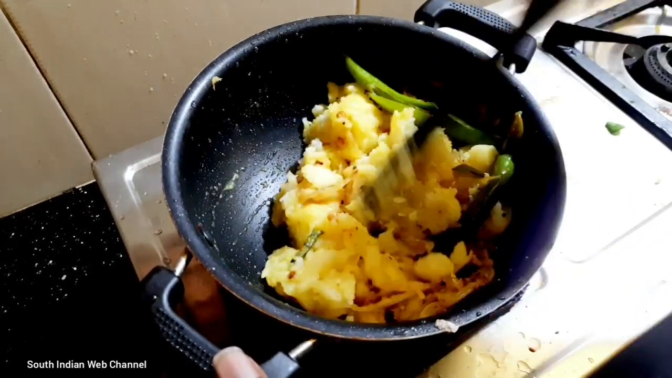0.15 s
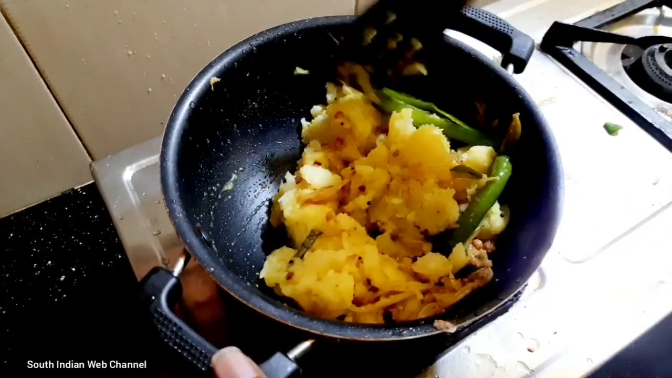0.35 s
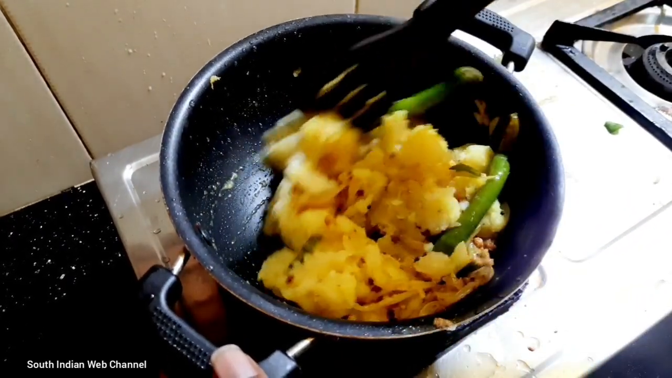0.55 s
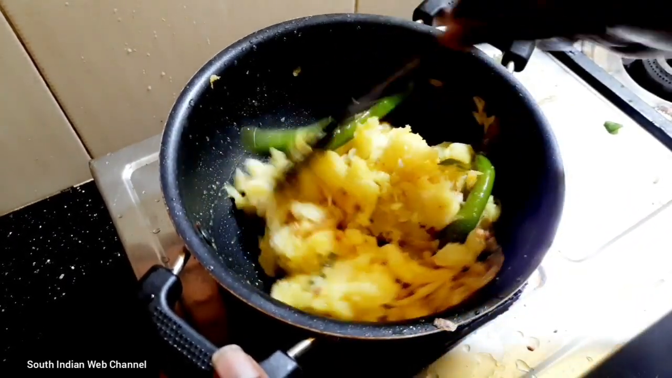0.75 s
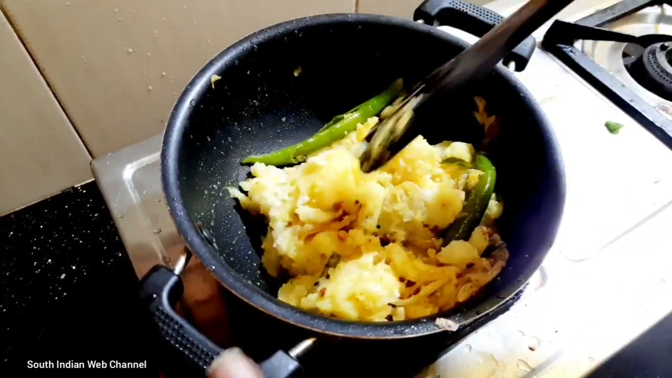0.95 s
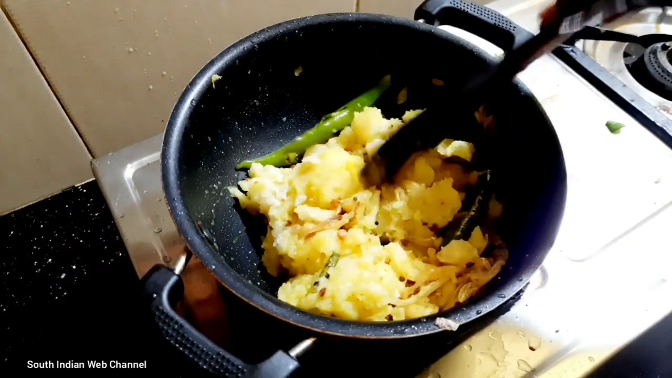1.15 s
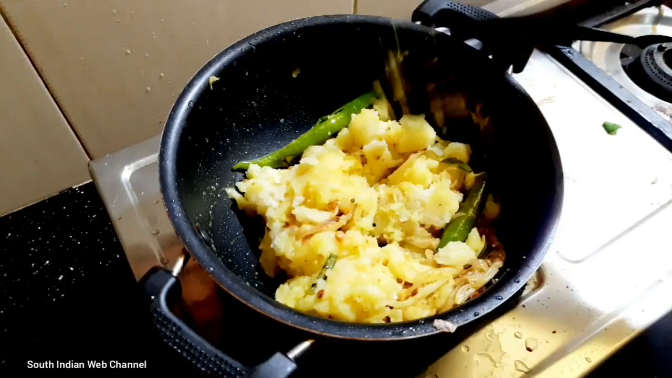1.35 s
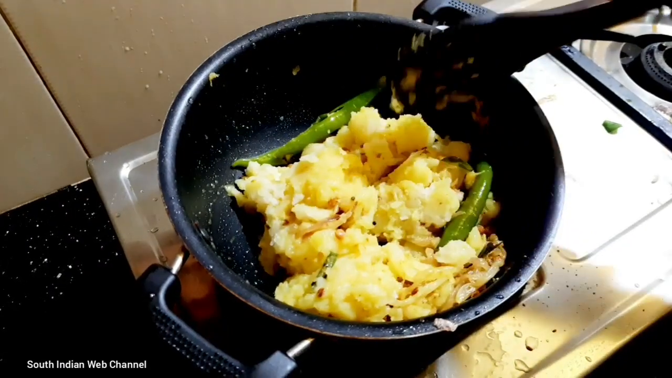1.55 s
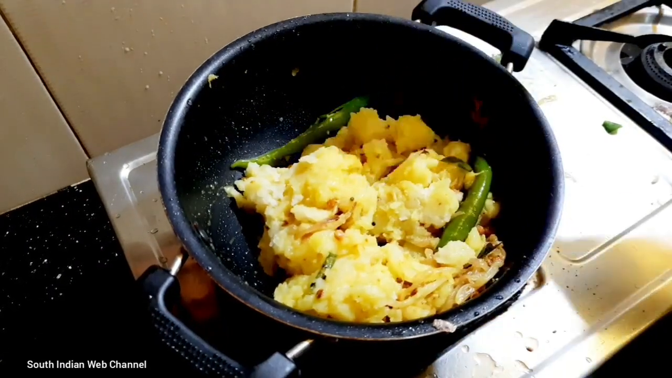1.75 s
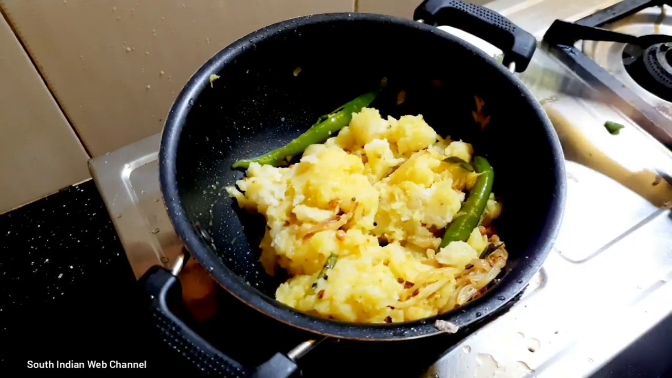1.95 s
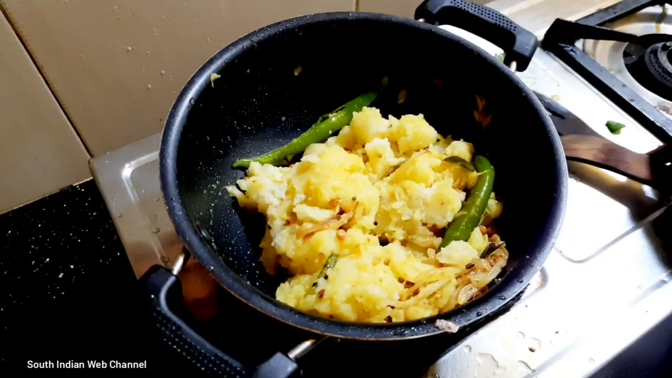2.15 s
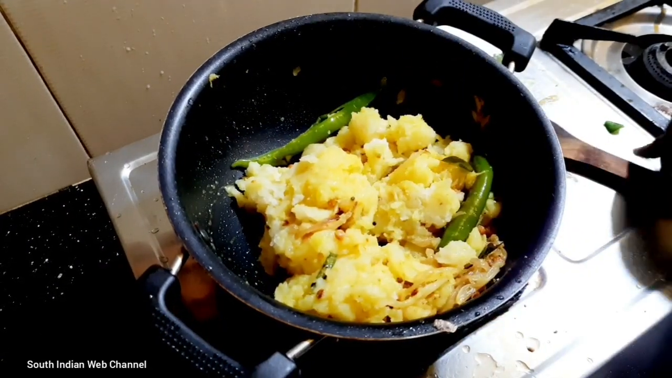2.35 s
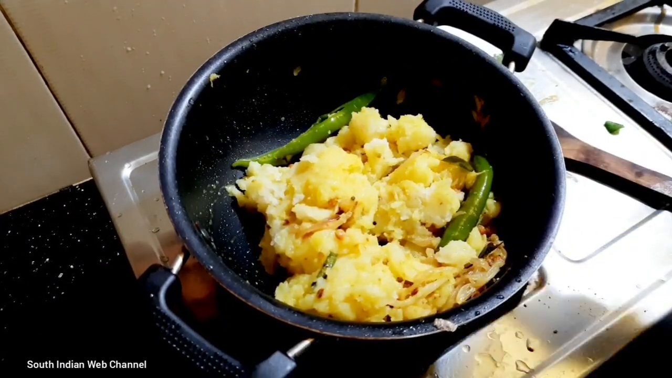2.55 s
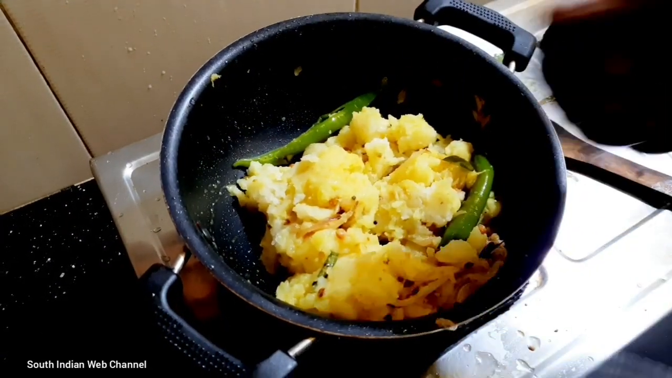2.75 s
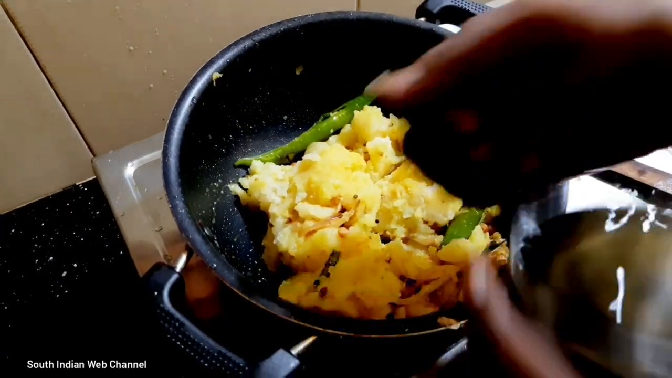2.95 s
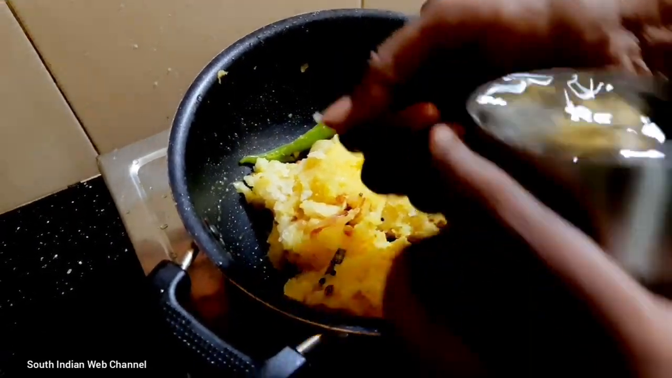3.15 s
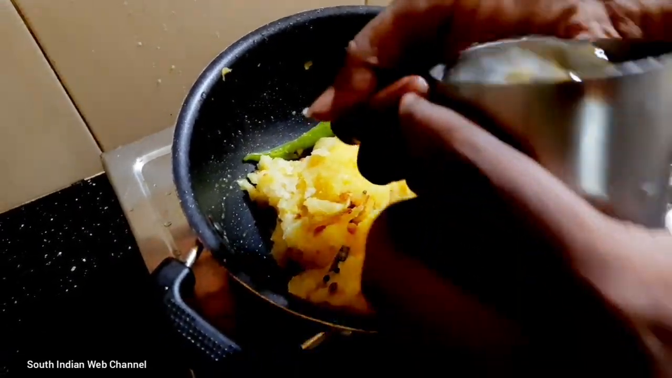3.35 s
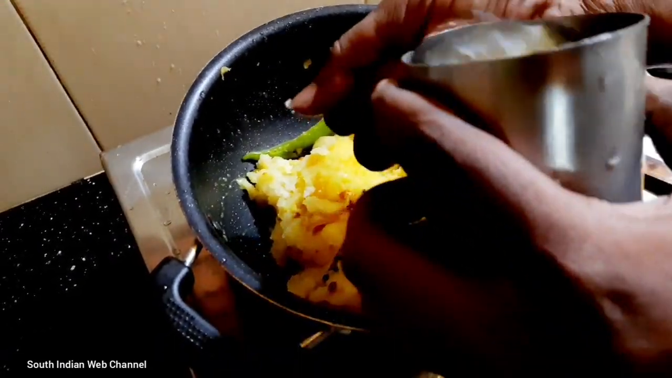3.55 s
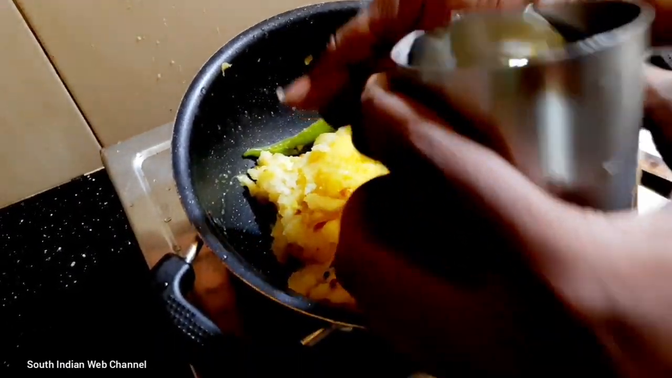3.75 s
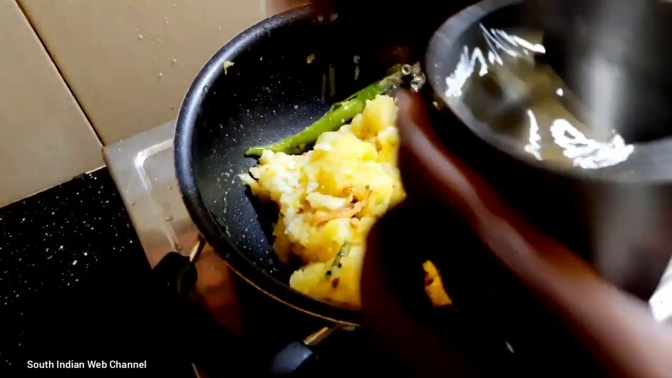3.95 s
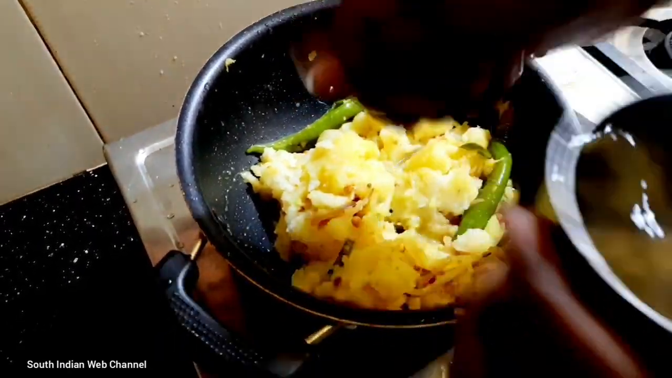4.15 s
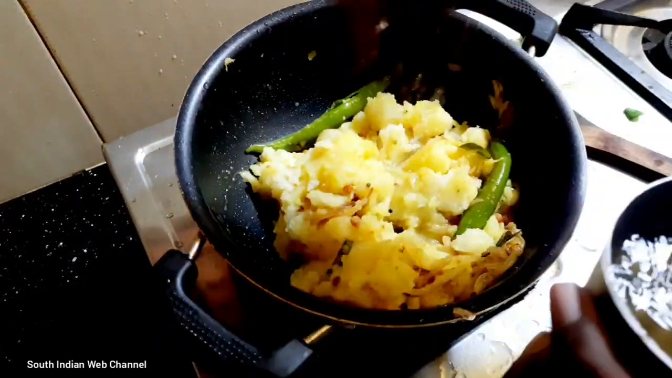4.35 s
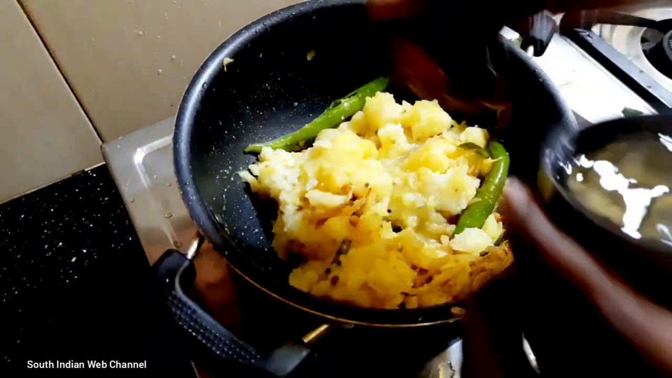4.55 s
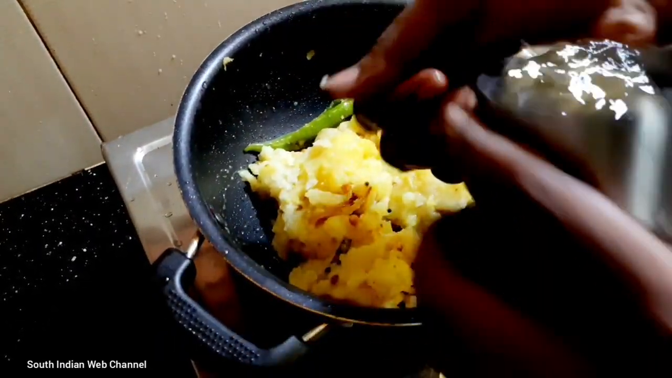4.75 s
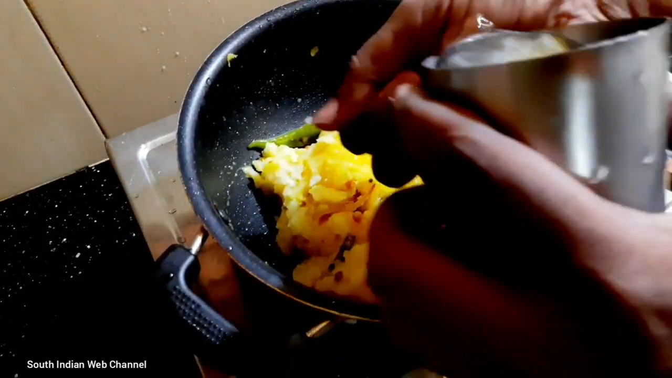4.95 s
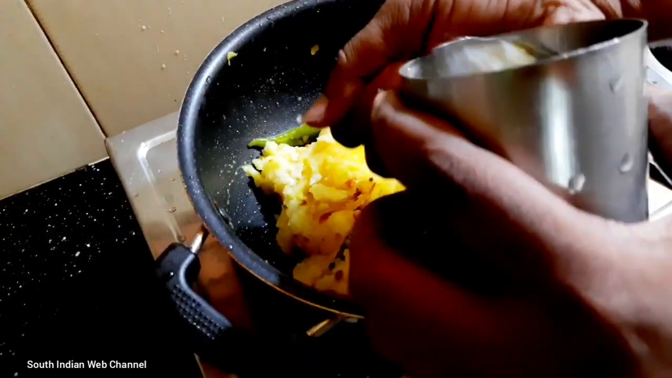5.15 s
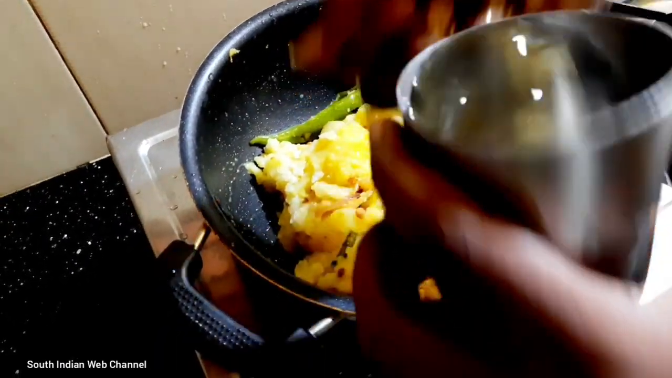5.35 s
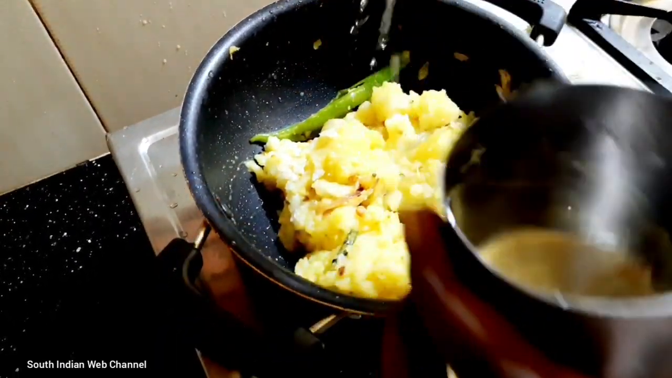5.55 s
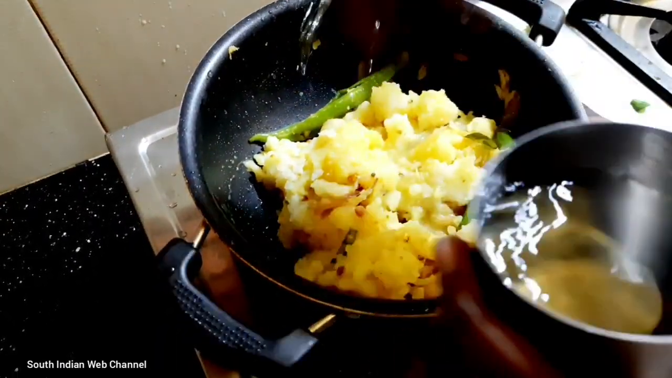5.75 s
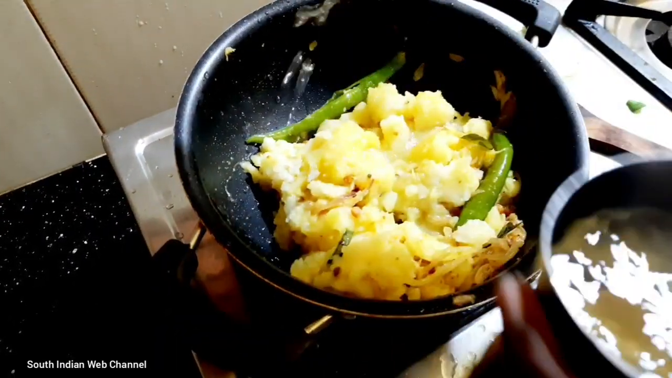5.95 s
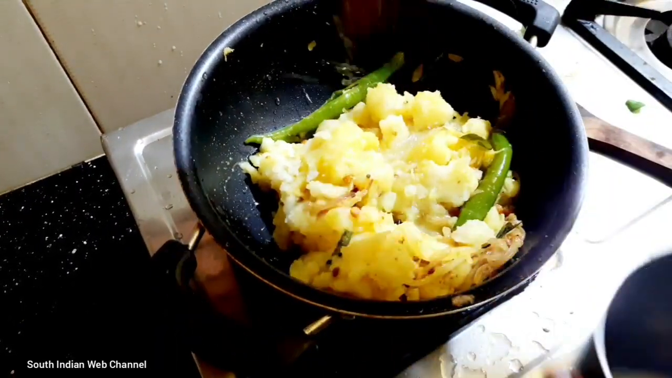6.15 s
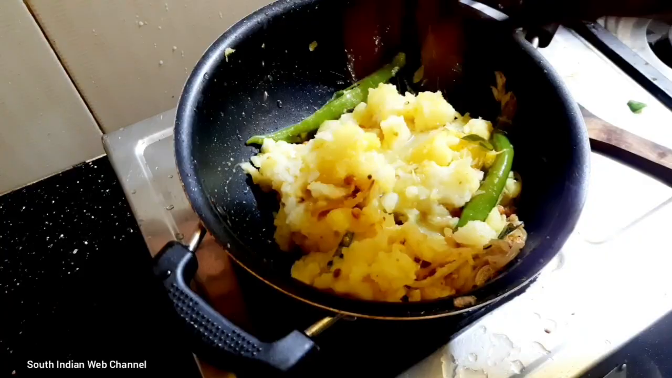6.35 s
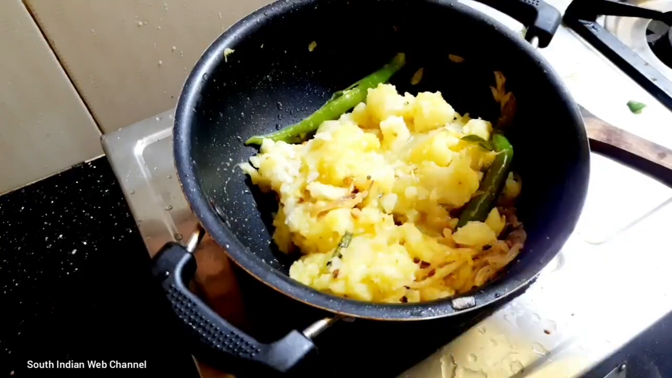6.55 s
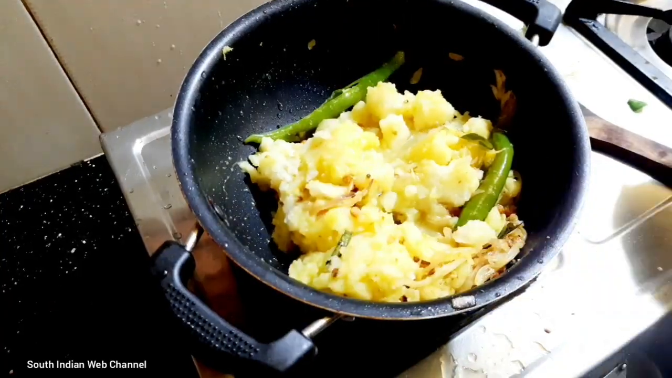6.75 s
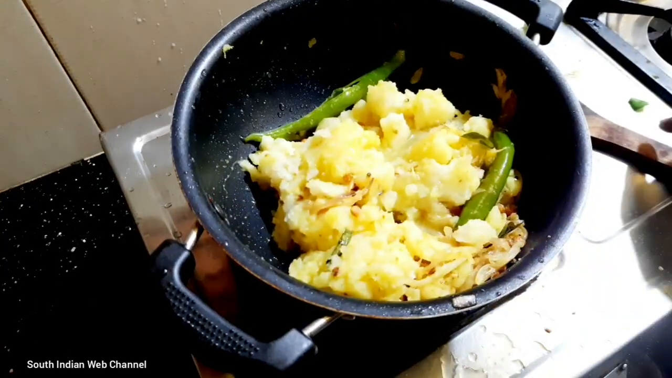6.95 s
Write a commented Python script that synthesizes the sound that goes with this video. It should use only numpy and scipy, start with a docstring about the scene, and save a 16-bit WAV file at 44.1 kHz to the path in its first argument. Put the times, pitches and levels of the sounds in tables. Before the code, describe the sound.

Potato mash sizzles faintly in a pan throughout, with tiny oil ticks and dull steam pops, heard close up over air noise and a low hum. During the first second a wooden spatula scrapes softly through the wet mash, tapping the pan at 0.4 seconds. A few dull microphone thuds come around 1 second, along with a brief spatter. At about 1.4 and 1.5 seconds the spatula knocks sharply twice on the rim, ringing the metal and the small tiled kitchen. A soft bump at 2 seconds is followed by a quick double clack at 2.4 as it lands on the steel stove. From about 3.5 to 5.8 seconds water drops fall into the pan in small groups, plipping and spattering, with the clearest plip near 4.1. The sizzle grows weaker, and something is set down with a soft, low bump around 6.9 seconds.

```python
"""A wooden spatula turns potato masala in a pan, is knocked clean on the rim and laid on the steel stove.
Each knock rings the metal and the small tiled kitchen. The mash sizzles faintly throughout: tiny bubbles
burst in the oil and steam escapes in dull pops. Wet fingers then flick water from a steel cup into the
pan, where it plips and spatters, and something is set down softly. Under it all lie air and a low hum."""
import sys
import numpy as np
from scipy import signal
from scipy.fft import rfft, irfft, next_fast_len
from scipy.io import wavfile

SR = 44100
rng = np.random.default_rng(int(sys.argv[2]) if len(sys.argv) > 2 else 0)


def master(y):
    """Save y as 16-bit WAV."""
    cut = np.clip(np.atleast_2d(y).T, -1, 1)
    pcm = np.round(cut * 32767)  # scale
    wavfile.write(sys.argv[1], SR, pcm.astype(np.int16))


N = 312669

# spatula strokes and the sizzle of the mash they turn onto hot metal: peak_s, length_s, drag_db, sizzle_db
SPATULA_STROKES = [(0.08, .14, -48.5, -59), (0.376, 0.22, -47.5, -67), (0.612, 0.11, -50, -58),
                   (0.806, 0.04, -61, -57), (1.183, 0.046, -56, -55.5)]
# water hitting hot metal and the sizzle that flares after it: start_s, level_db, decay_s, flare_db
WET_SPATTERS = [(.096, -45, 0.0078, -66), (1.036, -39.5, 0.0042, -47.5), (2.139, -38.5, 0.0023, -52),
                (3.457, -40, .012, -58), (3.915, -47.5, 0.019, -77), (4.991, -48.5, 0.0037, -50.5),
                (5.123, -51, .004, -61), (5.36, -49, 0.0046, -51.5), (5.769, -47.5, 0.02, -49),
                (5.806, -40.5, 0.011, -74), (5.829, -44.5, 0.011, -80)]
# bright tone of spatters and oil spits: frequency_hz, gain_db
SPATTER_EQ = [(2000, 15.5), (3000, 2), (4200, 0), (5500, 5), (8000, -1.5), (10500, -2), (13000, 3.5),
              (16000, -1)]


def spatula_knocks(body, clack_t60_s=0.031, tilt_from_hz=590):
    """Wood strikes metal: each blow has its own hardness and brief clack, and rings the same body."""
    # blows: start_s, level_db, tilt_db_per_octave, low_cut_hz, direct_db, clack_db, clack_hz, blade_share
    blows = [(.400, 13.5, 0.8, 262, -9, -19, 1960, 0.097), (1.3684, 22, -1.36, 280, -11, 10, 1268, 0.7),
             (1.5405, 26.5, 0, 105, -10, 11.5, 1252, 1), (2.3646, 24, -0.62, 237, -16, 0.5, 635, 0.54),
             (2.3807, 22, -3, 330, -20, 9.5, 554, 0.33)]
    # tone of wood on metal: frequency_hz, gain_db
    wood_eq = [(120, -0.5), (300, 0.5), (550, 2.1), (1200, -10), (2200, -7.5), (3700, -16), (5800, -21),
               (11000, -33.5)]
    # broad resonances of the blade and the struck metal: centre_hz, width_hz, gain_db
    blade_peaks = [(1003, 197, 10), (1387, 220, 11), (2600, 225, 3.5), (2990, 360, -4), (4100, 180, 2),
                   (4890, 330, 9.5), (5800, 380, 13), (7250, 640, 10), (8720, 990, 7.5),
                   (12100, 1700, 11.5)]
    out, t = np.zeros((2, N)), np.arange(SR // 20) / SR
    decay = np.log(1000) / clack_t60_s
    blade_db = lambda hz: sum(db / (1 + (2 * (hz - f) / width) ** 2) for f, width, db in blade_peaks)
    for start_s, level_db, tilt, low_cut_hz, direct_db, clack_db, clack_hz, blade_share in blows:
        hardness_db = lambda hz: tilt * np.log2(np.maximum(hz / tilt_from_hz, 1))
        bass_loss_db = lambda hz: 10 * np.log10(1 + (low_cut_hz / hz) ** 6)
        contact_db = lambda hz: curve_at(wood_eq, hz) + hardness_db(hz) - bass_loss_db(hz)
        blow = click(lambda hz: level_db + contact_db(hz) + blade_share * blade_db(hz))
        room = kitchen_reverb(early_db=-4.5, tail_db=-10, early_t60_s=0.13, rise_s=0.002)
        add(out, start_s, signal.fftconvolve(blow[None], amp(1.5) * body + room, axes=1))
        # straight at the microphone the small blade radiates little bass and an extra crack of treble
        direct = signal.lfilter(*signal.butter(1, 330, "high", fs=SR), blow)
        crack = signal.lfilter(*signal.butter(2, 2500, "high", fs=SR), blow)
        add(out, start_s, amp(direct_db) * direct_stereo(direct))
        add(out, start_s + .001, amp(direct_db + 2.5) * direct_stereo(crack))
        clack_ring = amp(clack_db) * 2 * decay / SR * np.exp(-decay * t) * np.sin(2 * np.pi * clack_hz * t)
        clack = signal.fftconvolve(blow, clack_ring)
        add(out, start_s, with_reverb(clack, 0, amp(-12.5) * room) * balance(-2, .8))
    return out * balance(-1, 1)


def metal_ring(build_cycles=0.79):
    """Pan and stove ring after one click; each mode builds up over its first cycles, so bass comes late."""
    # resonances of pan, stove and the corner around them: pitch_hz, level_db, t60_s
    modes = [(228.7, 6.5, 0.74), (256.2, 5.5, 0.32), (303.4, 11, 0.54), (380, 0, 0.16), (413, 1.5, 0.15),
             (456, 3.5, .28), (514, 3, 0.28), (562, -0.5, 0.75), (621, 3, 0.289), (700, -0.5, 0.46),
             (804, 5.5, 0.365), (910, 2.5, 0.62), (940, -7, 0.447), (1010, 1.5, .4), (1126, 0.5, 0.19),
             (1270, 3, 0.3), (1512, 1, 0.59), (1820, 6.5, 0.262), (1940, 0, 0.63), (2524, -4, 0.17),
             (2480, -2.5, .45)]
    t = np.arange(SR) / SR
    hz, db, t60_s = np.transpose(modes)[:, :, None]
    decay = np.log(1000) / t60_s
    envelope = np.exp(-decay * t) * (1 - np.exp(-t * hz / build_cycles))
    return (amp(db) * 2 * decay / SR * envelope * np.cos(2 * np.pi * hz * t)).sum(0)


def soft_bumps(body, cutoff_hz=900):
    """Soft contacts have no treble and reach only the low modes, which hum on."""
    # bumps of pan and stove: start_s, level_db, pitch_hz, width_octaves
    contacts = [(1.18, 3.5, 650, 0.72), (1.203, 6, 242, 0.29), (2.022, 12.5, 678, 0.24),
                (2.030, 29, 290, 0.22), (2.237, 7.5, 401, 0.44), (6.921, 20, 227, 0.44),
                (6.924, 8.5, 510, 0.54), (7.052, 3, 553, 0.49)]
    out = np.zeros((2, N))
    rooms = [kitchen_reverb(early_db=-13, tail_db=-12, rise_s=.012) for _ in range(3)]
    lowpass = signal.butter(6, cutoff_hz, fs=SR, output="sos")
    for k, (start_s, db, hz, octaves) in enumerate(contacts):
        push = signal.sosfilt(lowpass, tuned_click(db, hz, octaves, depth_db=70))
        add(out, start_s, with_reverb(push, direct_db=-9, response=amp(0.5) * body + rooms[k % len(rooms)]))
    return out * balance(-1, 1.1)


def spatula_drag():
    """The spatula slips through the wet mash in fine grains."""
    # tone of the wet scrape: frequency_hz, gain_db
    drag_eq = [(1200, -11), (1900, 2), (2400, -2.5), (3300, -1), (3900, -9.5), (6000, -18), (12000, -15)]
    push = sum(amp(db) * swell(peak_s, length_s) for peak_s, length_s, db, _ in SPATULA_STROKES)
    grains = diffuse_stereo(crackle(N, per_s=4000, spread_db=3.5))
    return push * unit_rms(equalise(grains, drag_eq))


def steam_pops(pitch_hz=1400, scatter_octaves=0.036):
    """Steam breaks through the thick mash in dull pops, all near one pitch."""
    # bursting bubbles: start_s, level_db
    bursts = [(0.46, -0.5), (0.566, -5.5), (1.037, -6.5), (1.267, -5), (1.974, -3.5), (2.139, -1.5),
              (2.599, -9.5), (2.684, -3.5), (3.022, -8.5), (3.46, -7.5), (3.736, -6.5), (3.940, -8),
              (4.217, -12), (4.277, -10), (4.366, -10.5), (4.559, -7.5), (5.123, -10.5), (5.503, -11.5),
              (5.55, -12.5), (5.713, -7)]
    pitches = pitch_hz * 2 ** (scatter_octaves * rng.standard_normal(len(bursts)))
    events = [(start_s, db, hz) for (start_s, db), hz in zip(bursts, pitches)]
    pops = plips(events, octaves=.45, direct_db=-3.5, splatter_db=-7.5, splatter_t60_s=0.089, room_db=-7)
    return pops * balance(-1.5, 1)


def water_drops():
    """Water drips from the fingers: a broad slap with the clear plip of a small air bubble."""
    # drops landing in the pan: start_s, level_db, pitch_hz
    drips = [(3.746, -9, 3500), (3.781, -5, 2730), (3.820, -8, 2900), (4.1486, 7, 2120), (4.692, -14, 4900),
             (4.908, -16, 3730), (5.018, -6, 2700), (5.146, -12.5, 3160), (5.168, -13, 9000),
             (5.812, -5.5, 3170), (5.833, -6, 2800)]
    bubbles = plips(drips, octaves=0.18, direct_db=-3.5, splatter_db=-3.5, splatter_t60_s=0.068,
                    room_db=-10.5)
    slaps = plips(drips, octaves=0.64, direct_db=-18.5, splatter_db=-3, splatter_t60_s=0.057, room_db=1)
    return (bubbles + amp(-19) * slaps) * balance(-2, 1.2)


def plips(events, octaves, direct_db, splatter_db, splatter_t60_s, room_db):
    """Bubbles ring for a few cycles, each with a short rough splatter and an echo of the kitchen."""
    out = np.zeros((2, N))
    rooms = [kitchen_reverb(splatter_db, room_db, splatter_t60_s, rise_s=0.0017) for _ in range(4)]
    for k, (start_s, db, hz) in enumerate(events):
        bubble = tuned_click(db, hz, octaves, depth_db=64)
        add(out, start_s, with_reverb(bubble, direct_db, rooms[k % len(rooms)][:, :SR // 3]))
    return out


def water_spatters(low_cut_hz=3270, attack_s=0.0005):
    """Water meets hot metal: a burst of fine crackle that dies quickly."""
    out, t = np.zeros((2, N)), np.arange(SR // 4) / SR
    for start_s, db, decay_s, _ in WET_SPATTERS:
        grains = crackle(len(t), per_s=2400, spread_db=4.5)
        fizz = equalise(grains, SPATTER_EQ, lambda hz: rolloff(low_cut_hz / (hz + 1), order=5))
        envelope = np.exp(-t / decay_s) * (1 - np.exp(-t / attack_s))
        add(out, start_s, amp(db) * unit_rms(fizz) * envelope)
    echo = signal.fftconvolve(out, kitchen_reverb(early_db=-1, tail_db=-3), axes=1)[:, :N]
    return amp(5.5) * out + echo


def oil_spits(relative_db=-10, low_cut_hz=2500, decay_s=.0012):
    """Stray larger bubbles of oil burst with sharp ticks, louder while the pan sizzles harder."""
    grains = crackle(N, per_s=22, spread_db=4.5)
    ticks = equalise(grains, SPATTER_EQ, lambda hz: rolloff(low_cut_hz / (hz + 1), order=2))
    t = np.arange(SR // 50) / SR
    burst = rng.standard_normal((2, len(t))) * np.exp(-t / decay_s)
    spits = signal.oaconvolve(ticks, burst, axes=1)[:, :N]
    return amp(relative_db + sizzle_db()) * unit_rms(spits)


def frying(full_sizzle_db=-55):
    """Slow bubbles in the mash, sizzle and fizz from the oil: three bands of crackle blurred with hiss."""
    # bands, low to high: full_level_db, db_per_sizzle_db, bursts_per_s, spread_db
    layers = [(-55, 1.16, 160, 3.5), (-55, 1, 1200, 3.1), (-56.5, 1.7, 3000, 5)]
    # tone of the frying: frequency_hz, gain_db
    fry_eq = [(410, -11), (700, -1.5), (873, -.5), (1190, -0.5), (1670, 2), (2080, -5), (2280, -8.5),
              (2590, -9), (3230, -12), (4580, -12.5), (5860, -12.5), (10100, -25), (15500, -16.5)]
    edges_hz = [600, 2200, 7000, 17000]
    change_db, out = sizzle_db() - full_sizzle_db, np.zeros((2, N))
    for (db, follow, per_s, spread_db), low_hz, high_hz in zip(layers, edges_hz, edges_hz[1:]):
        grains = crackle(N, per_s, spread_db)
        hiss = amp(2) * rng.standard_normal((2, N))
        bandpass = lambda hz: rolloff(low_hz / (hz + 1), order=6) * rolloff(hz / high_hz, order=6)
        band = equalise(diffuse_stereo(grains + hiss, lag_samples=7), fry_eq, bandpass)
        out += amp(db + follow * change_db) * unit_rms(band)
    return out * balance(-1, .8)


def sizzle_db(flare_rise_s=0.019, flare_decay_s=0.069, waver_db=0.37, wavers_per_s=6.6):
    """The frying level wavers a little, and flares after each spatter and under each stroke."""
    # how strongly the pan fries, falling as the water cools it: time_s, level_db
    fry_levels = [(0, -56), (.9, -54), (1.3, -56), (1.65, -54), (1.9, -55.5), (2.65, -55), (3.3, -58.5),
                  (3.75, -55.5), (4.2, -55.5), (4.5, -58), (5.3, -60.5), (5.9, -58.5), (6.25, -64),
                  (6.8, -63.5), (7.09, -59.5)]
    t = np.arange(N) / SR
    power = amp(np.interp(t, *np.transpose(fry_levels))) ** 2
    for start_s, _, _, flare_db in WET_SPATTERS:
        age = np.maximum(t - start_s, 0)
        power += (amp(flare_db) * (1 - np.exp(-age / flare_rise_s)) * np.exp(-age / flare_decay_s)) ** 2
    for peak_s, length_s, _, turned_db in SPATULA_STROKES:
        power += (amp(turned_db) * swell(peak_s, length_s)) ** 2
    waver = rng.standard_normal(400)
    return 10 * np.log10(power) + waver_db * np.interp(t * wavers_per_s, np.arange(len(waver)), waver)


def mic_handling_thuds():
    """The microphone is handled: dull low thuds, mostly on the right."""
    # low thuds: centre_s, level_db, pitch_hz, width_s
    thuds = [(.873, -22.5, 116, 0.0024), (.892, -21, 84.5, 0.0091), (1.027, -30.5, 69, 0.0052),
             (1.119, -32.5, 93.5, 0.0066), (1.147, -31, 106, 0.0054), (1.186, -36, 102, 0.0075)]
    out, t = np.zeros((2, N)), np.arange(-SR // 10, SR // 10) / SR
    for centre_s, db, hz, width_s in thuds:
        envelope = amp(db) * np.exp(-(t / width_s) ** 2 / 2)
        add(out, centre_s + t[0], -envelope * np.sin(2 * np.pi * hz * t))
    return out * balance(-19, -.5)


def room_tone():
    """Steady air noise and the slightly wavering hum of a mains motor."""
    # tone of the still kitchen: frequency_hz, gain_db
    air_eq = [(20, -26), (40, -15.5), (75, -15.5), (100, -8.5), (140, -3.5), (170, -14.5), (300, -11.5),
              (490, -13.5), (620, -17), (800, -24.5), (1000, -40.5), (1500, -28), (12800, -29.5),
              (15500, -26.5)]
    # motor harmonics: pitch_hz, level_db
    harmonics = [(49, -59.5), (98, -98), (147, -70.5), (294, -68.5), (392, -68), (441, -64.5), (490, -62)]
    t, knots_s = np.arange(N) / SR, np.arange(0, 8, .25)
    air = unit_rms(equalise(diffuse_stereo(rng.standard_normal((2, N))), air_eq))
    hum = np.zeros(N)
    for hz, db in harmonics:
        offset_s = rng.random()
        drift_s = np.interp(t, knots_s, rng.normal(0, .0001, len(knots_s)))
        hum += amp(db) * np.sqrt(2) * np.sin(2 * np.pi * hz * (t + offset_s + drift_s))
    return amp(-55) * air * balance(-.8, .8) + hum * balance(-2.2, 1.8)


def kitchen_reverb(early_db, tail_db, early_t60_s=0.069, rise_s=0.0014):
    """Dense early echoes from stove and wall, then the room's tail, darkening as it fades."""
    # decay of the tiled room: frequency_hz, t60_s
    decay_times = [(100, 0.89), (300, 0.73), (1000, 0.64), (3000, 0.49), (6000, 0.43), (15000, 0.28)]
    echoes = lambda: diffuse_stereo(rng.choice([-1., 1.], (2, SR)))
    hz, frame_s, spectrum = signal.stft(echoes(), SR, nperseg=256)
    fade = amp(-60 * frame_s / curve_at(decay_times, hz)[:, None])
    tail = signal.istft(spectrum * fade, SR, nperseg=256)[1][:, :SR]
    t = np.arange(SR) / SR
    early = echoes() * amp(-60 * t / early_t60_s)
    rise = 1 - np.exp(-t / rise_s)
    return (amp(early_db) * unit_rms(early * rise) + amp(tail_db) * unit_rms(tail * rise)) / np.sqrt(SR)


def crackle(size, per_s, spread_db):
    """Tiny bursting bubbles: random stereo clicks of uneven strength."""
    strength = amp(spread_db * np.minimum(rng.exponential(1, (2, size)), 4.5))
    polarity = rng.choice([-1., 1.], (2, size))
    bursting = rng.random((2, size)) < per_s / SR
    return unit_rms(strength * polarity * bursting)


def swell(peak_s, length_s):
    """The bell-shaped push of one stroke."""
    return np.exp(-2 * ((np.arange(N) / SR - peak_s) / length_s) ** 2)


def click(spectrum_db, size=4096):
    """The tightest click with the given spectrum (minimum phase)."""
    hz = abs(np.fft.fftfreq(size, 1 / SR)) + 1
    log_gain = np.log(amp(np.maximum(spectrum_db(hz), -70)))
    return np.fft.ifft(np.exp(np.conj(signal.hilbert(log_gain)))).real[:size // 2]


def tuned_click(db, centre_hz, octaves, depth_db):
    """A click with one broad resonance, its skirts levelling off depth_db below."""
    skirt_db = lambda hz: 10 * np.log10(1 + (np.log2(hz / centre_hz) / octaves) ** 4)
    return click(lambda hz: db - depth_db * np.tanh(skirt_db(hz) / depth_db))


def with_reverb(hit, direct_db, response):
    """A hit heard directly and through a stereo response."""
    sound = signal.fftconvolve(hit[None], response, axes=1)
    add(sound, 0, amp(direct_db) * direct_stereo(hit))
    return sound


def direct_stereo(x, lag_samples=2):
    """Direct sound reaches the left microphone first."""
    return np.array([x, np.pad(x, (lag_samples, 0))[:len(x)]])


def diffuse_stereo(x, lag_samples=2):
    """Makes two unrelated signals alike in the bass, as at two close microphones; the right one lags."""
    # likeness of left and right: frequency_hz, correlation
    likeness = [(50, 1), (300, 0.63), (600, 0.48), (1200, 0.17), (2500, 0.14), (6000, 0.17), (15000, 0.15)]
    angle = lambda hz: np.arccos(np.clip(curve_at(likeness, hz), 0, 1)) / 2
    mid = colour(x[0], lambda hz: np.cos(angle(hz)))
    side = colour(x[1], lambda hz: np.sin(angle(hz)))
    return np.array([mid + side, np.roll(mid - side, lag_samples)])


def equalise(x, eq, cut=lambda hz: 1):
    """Applies an EQ curve and an optional cut filter."""
    return colour(x, lambda hz: amp(curve_at(eq, hz)) * cut(hz))


def colour(x, gain):
    """Filters by a gain given as a function of frequency."""
    size = next_fast_len(x.shape[-1])
    return irfft(rfft(x, size) * gain(np.fft.rfftfreq(size, 1 / SR)), size)[..., :x.shape[-1]]


def rolloff(ratio, order):
    """Filter gain that falls away as a frequency ratio passes 1."""
    return 1 / np.sqrt(1 + ratio ** (2 * order))


def curve_at(points, hz):
    """Reads a curve along a log-frequency axis."""
    points_hz, values = np.transpose(points)
    return np.interp(np.log(hz + 1), np.log(points_hz + 1), values)


def add(mix, start_s, sound):
    """Mixes a sound in at start_s."""
    part = mix[:, max(round(start_s * SR), 0):][:, :sound.shape[-1]]
    part += sound[..., :part.shape[1]]


def balance(left_db, right_db):
    """A gain for each channel."""
    return amp([[left_db], [right_db]])


def amp(db):
    """Decibels to gain."""
    return 10 ** (np.asarray(db) / 20)


def unit_rms(x):
    """Scales to rms 1."""
    return x / np.sqrt(np.mean(x ** 2) + 1e-20)


def scene():
    """Spatula and pan up front, over the cooking and the room tone."""
    body = direct_stereo(metal_ring())
    utensils = spatula_knocks(body) + soft_bumps(body) + spatula_drag()
    cooking = steam_pops() + water_drops() + water_spatters() + oil_spits() + frying()
    return utensils + cooking + mic_handling_thuds() + room_tone()


def record(dry):
    """The microphone's uneven treble, then a steep high cut."""
    # microphone response: frequency_hz, gain_db
    mic_eq = [(7000, 0), (9200, 3.5), (10300, 0), (12200, 1.5), (15500, -2.5)]
    high_cut = signal.firwin(511, cutoff=15900, window=("kaiser", 9), fs=SR)
    return signal.oaconvolve(equalise(dry, mic_eq), high_cut[None], "same")


dry = scene()
out = record(dry)
master(out)
```